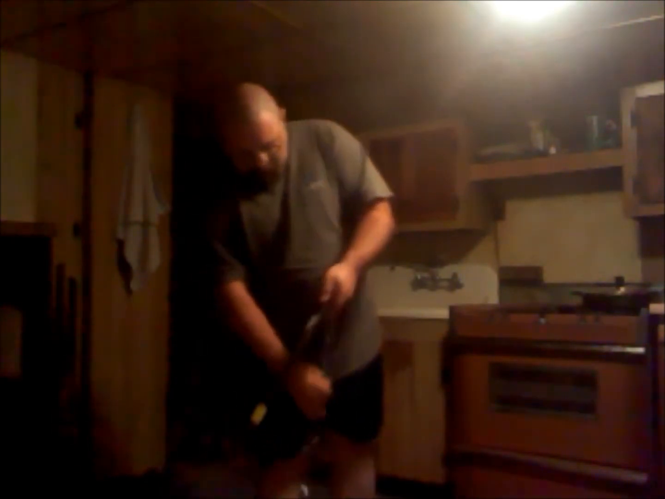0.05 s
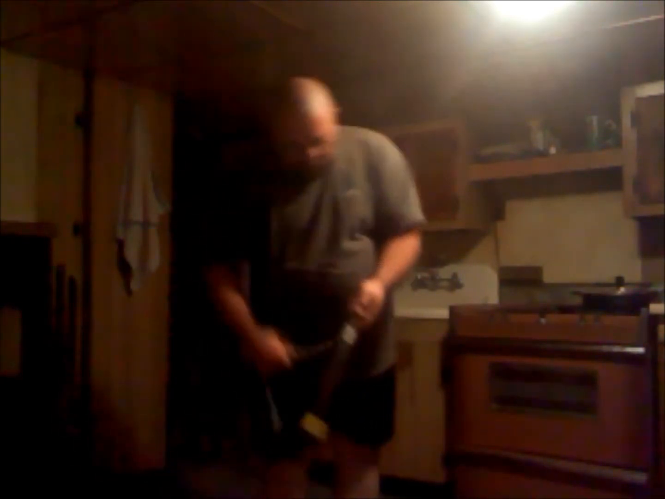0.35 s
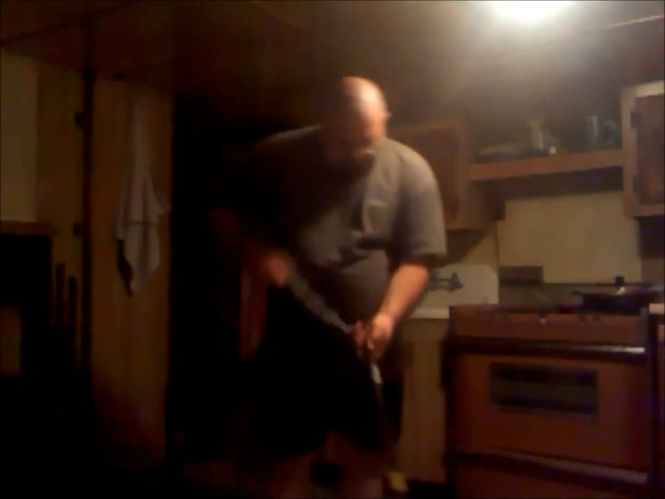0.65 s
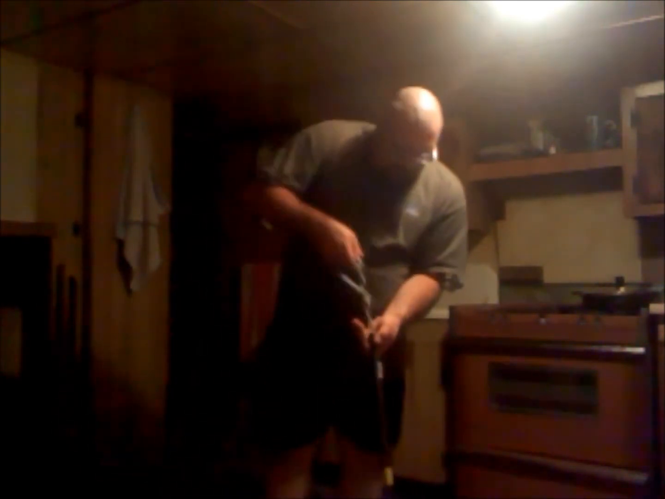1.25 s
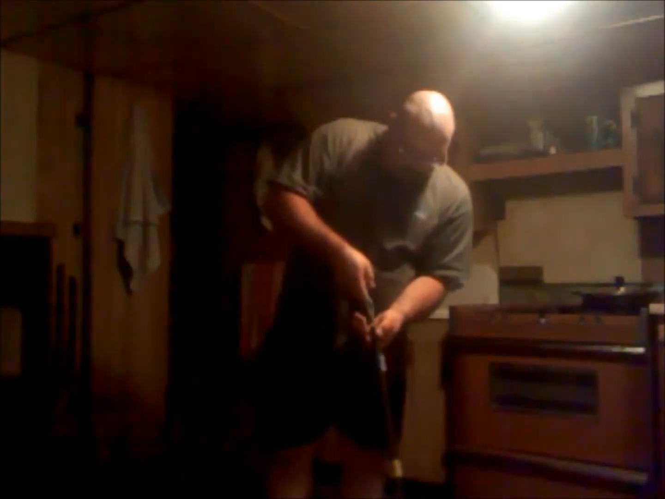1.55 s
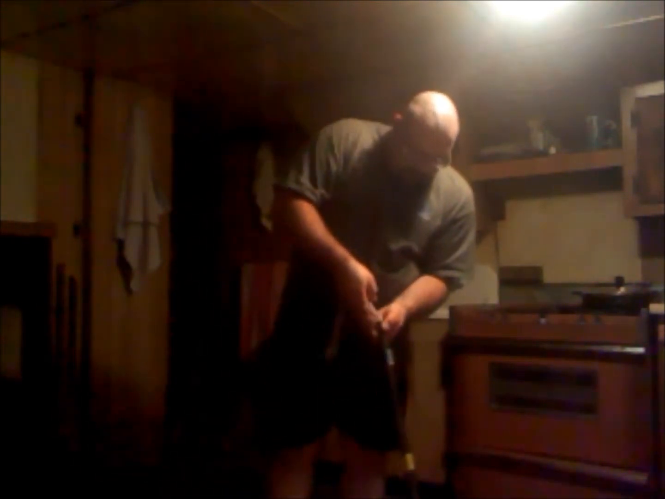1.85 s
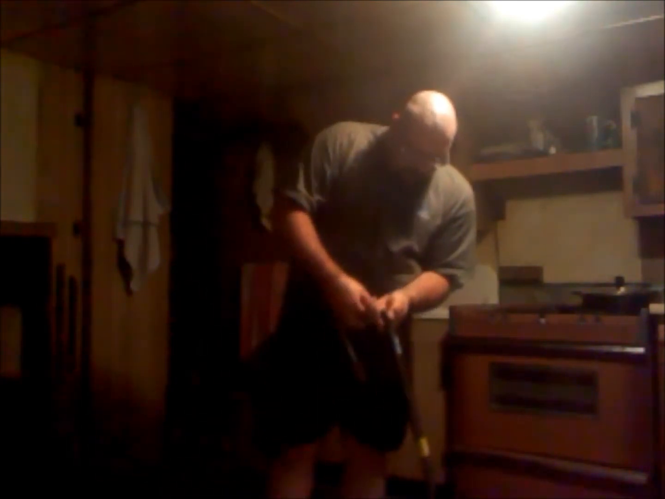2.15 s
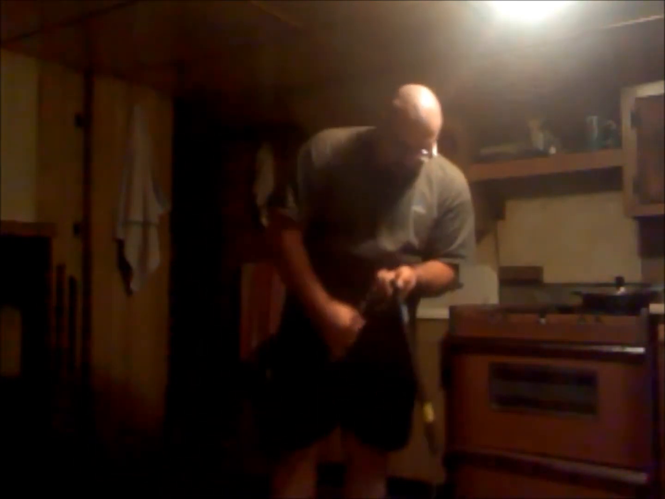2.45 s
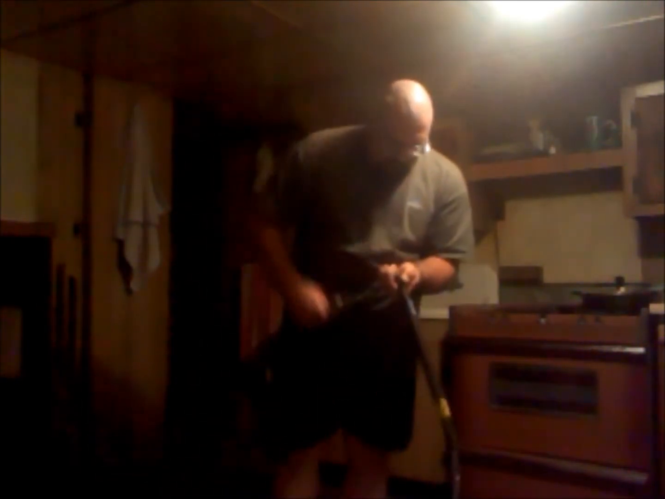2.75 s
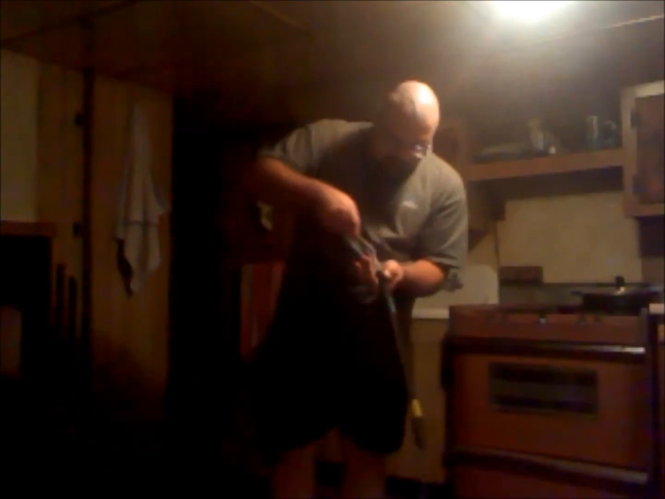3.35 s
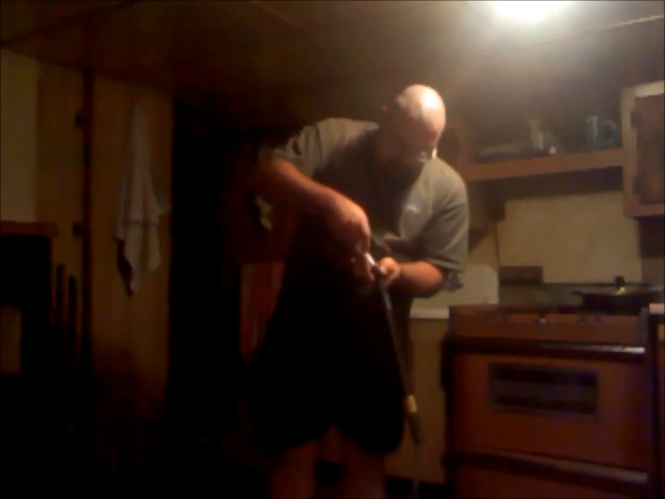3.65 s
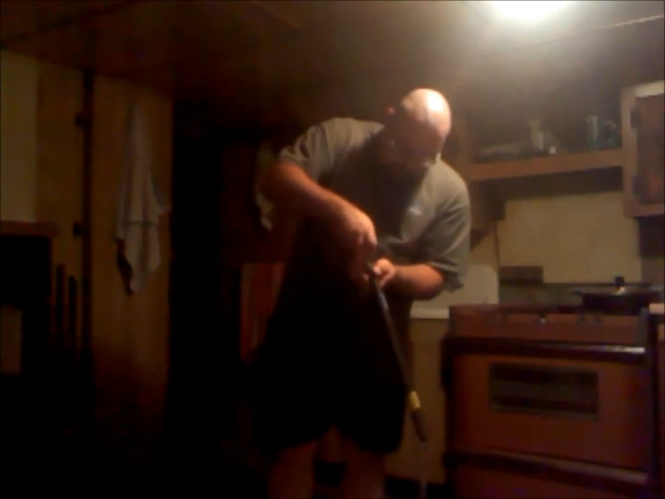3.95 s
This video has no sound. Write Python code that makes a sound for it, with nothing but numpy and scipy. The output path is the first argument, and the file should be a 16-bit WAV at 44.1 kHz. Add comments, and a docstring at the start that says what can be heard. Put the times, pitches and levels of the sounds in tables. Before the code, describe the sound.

A light steel chain clinks and slides through the hands over a low appliance hum.

```python
"""A light steel chain is drawn through the hands in a small kitchen, in two bouts and a last tug.
Its links knock and slide on each other and all ring with nearly the same few modes.
Small fittings ping, the holder knocks, and handling adds dull clatter and soft bumps.
An appliance hums low, and the microphone adds hiss and a faint pulsing whine."""
import sys
import numpy as np
from scipy import signal
from scipy.fft import rfft, irfft, next_fast_len
from scipy.io import wavfile

SR = 44100
rng = np.random.default_rng(int(sys.argv[2]) if len(sys.argv) > 2 else 0)


def to_wav(sig):
    """Store sig (one row per channel, or 1-D mono) as 16-bit WAV at the path in sys.argv[1].

    Samples outside -1..1 are clipped; the rate is SR.
    """
    pcm = np.clip(np.atleast_2d(sig), -1, 1) * 32767
    pcm = np.round(pcm).astype(np.int16)
    wavfile.write(sys.argv[1], SR, pcm.T)  # frames by channels


N = 176400
LEFT_RIGHT = np.array([[.5], [-.5]])


def amp(db):
    """Decibels to gain."""
    return 10 ** (np.asarray(db) / 20)


def unit(x):
    """Scaled to rms 1."""
    return x / np.sqrt(np.mean(x ** 2) + 1e-20)


def along(points, hz):
    """(Hz, value) points read on a log axis."""
    f, v = np.transpose(points)
    return np.interp(np.log(hz + 1), np.log(f + 1), v)


def filtered(x, response):
    """x through a complex frequency response."""
    n = x.shape[-1]
    m = next_fast_len(n + 8192)
    return irfft(rfft(x, m) * response(np.fft.rfftfreq(m, 1 / SR)), m)[..., :n]


def add(out, start_s, sound):
    """Mixes a sound into out."""
    i = max(0, round(start_s * SR))
    n = max(0, min(sound.shape[-1], N - i))
    out[..., i:i + n] += sound[..., :n]


def ring(t, hz, t60_s, attack_s=0.00054):
    """One decaying mode, building up as the contact rubs."""
    envelope = amp(-60 * t / t60_s) * (1 - np.exp(-t / attack_s))
    return envelope * np.sin(2 * np.pi * (hz * t + rng.random()))


def jingle(t, hz, t60_s, detune=.0015, near_spread=.025, near_db=-12.5, near_life=0.41):
    """One mode of a link and, more briefly, of two slightly different neighbours."""
    tune, *others = rng.standard_normal(3)
    near = sum(ring(t, hz * (1 + near_spread * k), t60_s * near_life) for k in others)
    return ring(t, hz * (1 + detune * tune), t60_s) + amp(near_db) * near


def chatter(sound, count=3, within_s=.007, rebound_db=-10):
    """A contact and its quick rebounds, at unchanged energy."""
    delays = (rng.random(count) * within_s * SR).astype(int)
    series = sound + amp(rebound_db) * sum(np.pad(sound, (d, 0))[:len(sound)] for d in delays)
    return series * np.linalg.norm(sound) / np.linalg.norm(series)


def burst(t, spectrum, t60_s):
    """Decaying coloured noise."""
    noise = filtered(rng.standard_normal(len(t)), lambda hz: amp(along(spectrum, hz)))
    return unit(noise) * amp(-60 * t / t60_s)


# kitchen reverberation (frequency [Hz], t60 [s])
ROOM_DECAY = [(200, 0.1), (2000, 0.19), (6000, 0.14), (14000, 0.082)]
def in_room(x, tail_db=3.5, side_gain=0.81):
    """Direct sound plus a fresh stereo tail, at unchanged mean energy per channel."""
    hz, t, noise = signal.stft(rng.standard_normal((2, SR // 8)), SR, nperseg=256)
    decay = amp(-60 * t / along(ROOM_DECAY, hz)[:, None])
    mid, side = signal.istft(noise * decay, SR, nperseg=256)[1]
    response = np.array([mid + side_gain * side, mid - side_gain * side])
    response *= amp(tail_db) / np.linalg.norm(response[0])
    response[:, 0] += 1  # direct path
    wet = signal.fftconvolve(x[None], response, axes=1)
    return wet * np.sqrt(2) * np.linalg.norm(x) / np.linalg.norm(wet)


# noise floor (frequency [Hz], relative density [dB])
AIR_SPECTRUM = [(20, -52), (35, -66.5), (60, -61.5), (100, -67.5), (160, -69), (260, -68.5), (420, -73),
                (850, -74), (1400, -80.5), (2200, -86.5), (3000, -89), (4500, -92), (15500, -93.5)]
# its left-right likeness (frequency [Hz], correlation [0..1])
AIR_CORRELATION = [(60, .92), (140, .25), (300, .72), (800, .72), (2000, .45), (5000, .15)]
def air(rms_db=-39.5, low_cut_hz=15):
    """Steady room noise and microphone hiss."""
    def mid_side(hz):
        angle = np.arccos(np.clip(along(AIR_CORRELATION, hz), -1, 1)) / 2
        return amp(along(AIR_SPECTRUM, hz)) * [np.cos(angle), np.sin(angle)] * (hz > low_cut_hz)
    mid, side = filtered(rng.standard_normal((2, N)), mid_side)
    return amp(rms_db) * unit(np.array([mid + side, mid - side]))


def whine(t, hz=3462, peak_db=-49, rate_hz=59.59, first_s=.0144, sigma_s=0.0013):
    """Electrical whine in even Gaussian pulses."""
    from_peak_s = ((t - first_s) * rate_hz + .5) % 1 / rate_hz - .5 / rate_hz
    pulses = np.exp(-.5 * (from_peak_s / sigma_s) ** 2)
    return amp(peak_db) * pulses * np.sin(2 * np.pi * hz * from_peak_s)


# appliance tones (frequency [Hz], rms level [dB], left minus right [dB])
HUM_TONES = [(90.66, -33.5, 2.5), (120.1, -49.5, -1), (199.5, -62, -18), (294.3, -59.5, 9.5),
             (355.2, -58, -4.5), (493, -55.5, -2)]
def hum(t, left_phase_rad=-0.32):
    """An appliance hums on steady low tones."""
    out = np.zeros((2, N))
    for hz, db, pan_db in HUM_TONES:
        phase = 2 * np.pi * (hz * t + rng.random()) + LEFT_RIGHT * left_phase_rad
        out += np.sqrt(2) * amp(db + LEFT_RIGHT * pan_db) * np.sin(phase)
    return out


# handling bumps (time [s], level [dB])
BUMP_HITS = [(.23, -35), (0.306, -38), (0.476, -38.5), (2.171, -37)]
def bumps(hz=264.3, t60_s=0.43, attack_s=0.0084):
    """Handling and shifting weight softly ring one low mode."""
    out, t = np.zeros((2, N)), np.arange(SR // 2) / SR
    swell = 1 - np.exp(-t / attack_s)
    for start_s, db in BUMP_HITS:
        add(out, start_s, amp(db) * in_room(ring(t, hz, t60_s) * swell))
    return out


# clatter bursts (time [s], level [dB], t60 [s])
CLATTER_HITS = [(.021, -35.5, .15), (0.051, -47, 2.3), (0.159, -47, 0.12)]
# their colour (frequency [Hz], relative density [dB])
CLATTER_SPECTRUM = [(600, -21), (1400, -6.5), (1850, 5.5), (2500, -1.5), (5000, -25)]
def clatter():
    """The bunched chain clatters dully as it is first lifted and settles."""
    out, t = np.zeros((2, N)), np.arange(SR) / SR
    for start_s, db, t60_s in CLATTER_HITS:
        add(out, start_s, amp(db) * in_room(burst(t, CLATTER_SPECTRUM, t60_s)))
    return out


# fitting pings (time [s], frequency [Hz], ring level [dB], click level [dB])
PING_HITS = [(.885, 11800, -47, -56), (.923, 10900, -41, -54), (1.468, 9950, -45, -40),
             (2.175, 6600, -51, -37.5), (2.402, 6350, -44.5, -39)]
def pings(ring_t60_s=0.13, click_t60_s=0.033):
    """Small fittings click and ring high."""
    out, t = np.zeros((2, N)), np.arange(SR // 2) / SR
    for start_s, hz, ring_db, click_db in PING_HITS:
        click = amp(click_db - 60 * t / click_t60_s) * rng.standard_normal(len(t))
        add(out, start_s, in_room(amp(ring_db) * jingle(t, hz, ring_t60_s) + click))
    return out


# holder knocks (time [s], level [dB])
KNOCK_HITS = [(.885, -35), (.972, -45), (.991, -37.5), (1.266, -34), (3.35, -35), (3.375, -38)]
def knocks(hz=783, t60_s=0.059):
    """The part that holds the chain knocks dully and rebounds."""
    out, t = np.zeros((2, N)), np.arange(SR // 7) / SR
    for start_s, db in KNOCK_HITS:
        add(out, start_s, amp(db) * in_room(chatter(jingle(t, hz, t60_s))))
    return out


# unpitched steel contact, in slide and clinks (frequency [Hz], relative density [dB])
CONTACT_SPECTRUM = [(300, -8.5), (780, -4), (1300, -4.5), (2100, 3), (3000, -4.5), (4000, -9.5),
                    (5000, -22.5), (15000, -17.5)]
# resonances stirred by sliding (frequency [Hz])
SLIDE_MODES_HZ = [790, 2075, 2185, 3875, 6025, 8420, 10850]
# their peaks (width [Hz], relative level [dB])
SLIDE_PEAKS = [(100, -3.5), (54.6, -4.5), (118, -2.5), (129, 0), (60, -4.5), (200, -17), (350, -23)]
# sliding envelope (time [s], level [dB])
SLIDE_LEVELS = [(.7, -72), (.92, -47), (1.069, -53), (1.27, -50), (1.45, -52), (1.68, -54), (1.78, -70),
                (2.12, -72), (2.18, -54), (2.27, -109), (2.88, -63), (2.99, -49.5), (3.07, -51),
                (3.16, -43), (3.27, -46), (3.35, -44.5), (3.41, -53.5), (3.49, -52), (3.62, -56.5),
                (3.8, -51), (3.88, -41), (3.99, -66)]
def slide(t, touches_per_s=800, scatter_db=8, scrape_db=2.5):
    """Many tiny contacts scrape and ring the links while the chain moves."""
    def steel(hz):
        return sum(amp(db) * 1j * hz * width_hz / (mode_hz ** 2 - hz ** 2 + 1j * hz * width_hz)
                   for mode_hz, (width_hz, db) in zip(SLIDE_MODES_HZ, SLIDE_PEAKS))
    touching = rng.random(N) < touches_per_s / SR
    strength = amp(scatter_db * np.clip(rng.standard_normal(N), -2, 2))
    touches = touching * strength * np.sign(rng.standard_normal(N))
    ringing = unit(filtered(touches, steel))
    scrape = unit(filtered(touches, lambda hz: amp(along(CONTACT_SPECTRUM, hz))))
    envelope = amp(np.interp(t, *np.transpose(SLIDE_LEVELS)))
    return in_room((ringing + amp(scrape_db) * scrape) * envelope)[:, :N]


SLACK_FROM_S, SMALL_TAUT_DB, SMALL_SLACK_DB = 2, -16, -3.5  # smaller links join in on the slack chain
# link modes (frequency [Hz], frequency on smaller links [Hz], t60 [s])
LINK_MODES = [(2071, 2180, 0.14), (3859, 3893, 0.16), (6024, 6032, 0.18), (8410, 8370, 0.096),
              (10770, 10950, 0.088)]
# link contacts (time [s], mode 1 [dB], mode 2 [dB], mode 3 [dB], higher modes [dB])
LINK_CONTACTS = [(.842, -34.5, -49, -60, -63), (.885, -48, -51, -53, -61), (.915, -33.5, -41, -46, -60),
                 (.9727, -48, -40.5, -47, -52), (.9896, -28.5, -48, -59, -62),
                 (1.138, -26, -36.5, -54, -53), (1.2231, -24.5, -42, -46, -60),
                 (1.2474, -29.5, -31, -53, -50), (1.266, -22.5, -26.5, -38.5, -53),
                 (1.3269, -27.5, -31.5, -45, -49), (1.3668, -25.5, -42, -51, -58),
                 (1.4032, -33, -44, -46, -53), (1.4476, -35, -41, -42, -48),
                 (1.5174, -33.5, -33, -39.5, -49), (1.6392, -32.5, -43, -62, -65),
                 (1.688, -35.5, -42.5, -48.5, -54), (2.968, -39.5, -31.5, -34, -43),
                 (2.9894, -39.5, -34, -32, -56), (3.0074, -46, -40, -50, -62), (3.033, -46, -49, -47, -52),
                 (3.0789, -41, -36.5, -53, -53), (3.104, -31.5, -42, -38, -42.5),
                 (3.1364, -28.5, -29.5, -32, -40), (3.16, -23.5, -35, -34, -42),
                 (3.2006, -38, -29, -32.5, -44), (3.235, -40, -34, -37, -53),
                 (3.29, -35, -24.5, -26.5, -39), (3.3274, -31.5, -30, -31, -40),
                 (3.3494, -32.5, -34.5, -43, -43), (3.4511, -33.5, -36, -44, -57),
                 (3.7234, -43, -38, -57, -64), (3.8486, -32, -23.5, -34.5, -39.5),
                 (3.8674, -32.5, -34, -40, -47), (3.8884, -30.5, -34, -42, -43)]
def clinks(crack_db=-5, edge_db=2, crack_t60_s=0.034, swell_cycles=5.2, damping_db_per_s=220):
    """Each contact cracks and rings the links, until the next contact damps them."""
    out, t = np.zeros((2, N)), np.arange(SR // 7) / SR
    gaps_s = np.diff([row[0] for row in LINK_CONTACTS] + [N / SR])
    for (start_s, *mode_db), gap_s in zip(LINK_CONTACTS, gaps_s):
        crack = amp(crack_db + np.mean(mode_db[:2])) * burst(t, CONTACT_SPECTRUM, crack_t60_s)
        edge = amp(edge_db + mode_db[-1] - 60 * t / crack_t60_s) * rng.standard_normal(len(t))
        add(out, start_s, in_room(chatter(crack) + edge))
        small_gain = amp(SMALL_SLACK_DB if start_s > SLACK_FROM_S else SMALL_TAUT_DB)
        damping = amp(-damping_db_per_s * np.maximum(t - gap_s, 0))
        for (hz, small_hz, t60_s), db in zip(LINK_MODES, mode_db + mode_db[-1:]):
            links = jingle(t, hz, t60_s) + small_gain * jingle(t, small_hz, t60_s)
            links /= np.hypot(1, small_gain)
            swell = 1 - np.exp(-t * hz / swell_cycles)  # slower for low modes
            add(out, start_s, amp(db) * in_room(chatter(links * swell * damping)))
    return out


def scene(left_lead_s=.000018):
    """The chain, a little to the left, over the kitchen background."""
    t = np.arange(N) / SR
    chain = clinks() + knocks() + slide(t) + pings() + clatter() + bumps()
    chain = filtered(chain, lambda hz: np.exp(2j * np.pi * hz * left_lead_s * LEFT_RIGHT))
    return chain + hum(t) + air() + whine(t)


def record(dry, top_hz=15850, offset=-.1235, drift_gain=.012, drift_hz=2):
    """The input is band-limited and sits on a slowly drifting DC offset."""
    drift = unit(filtered(rng.standard_normal(N), lambda hz: hz < drift_hz))
    return filtered(dry, lambda hz: hz < top_hz) + offset + drift_gain * (drift - drift.mean())


dry = scene()
out = record(dry)
to_wav(out)
```